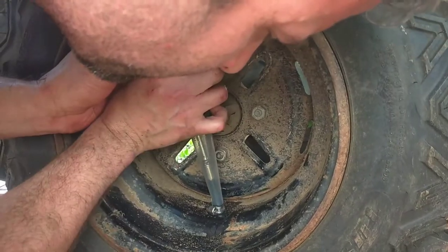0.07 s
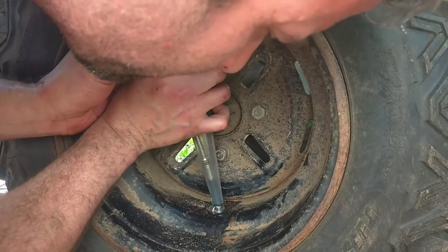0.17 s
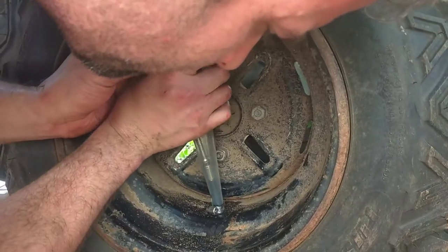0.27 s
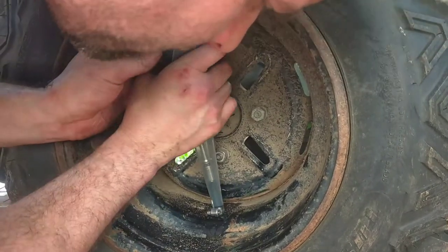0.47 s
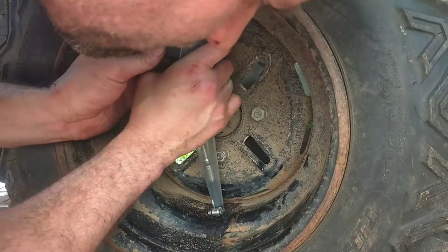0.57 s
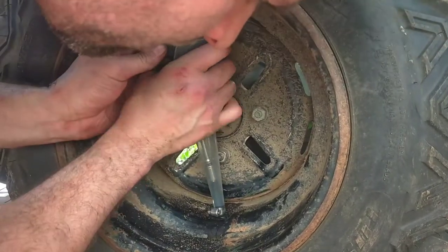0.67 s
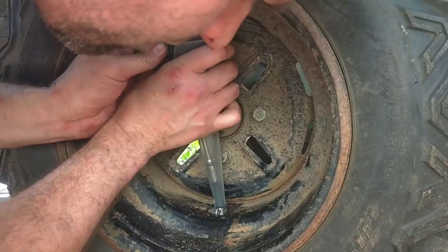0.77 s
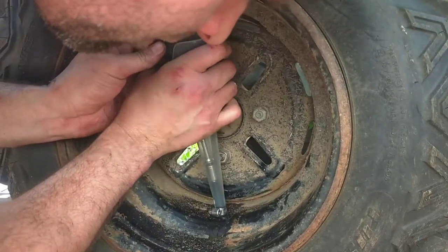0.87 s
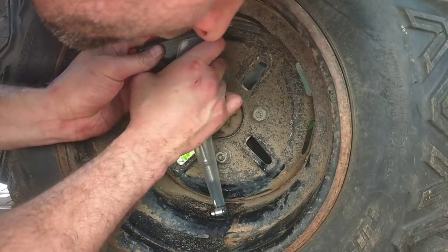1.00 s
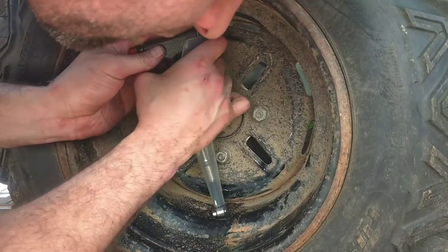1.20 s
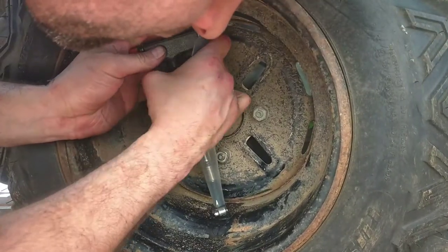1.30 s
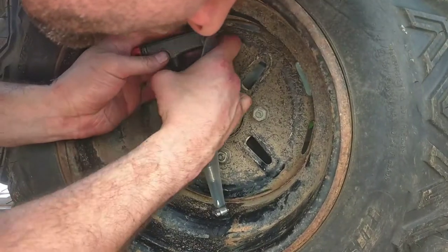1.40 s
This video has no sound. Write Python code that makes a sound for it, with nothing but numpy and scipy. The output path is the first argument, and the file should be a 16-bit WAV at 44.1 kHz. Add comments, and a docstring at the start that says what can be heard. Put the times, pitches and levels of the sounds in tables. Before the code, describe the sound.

Two dull clicks of a metal tool on a wheel rim, over outdoor rumble and hiss.

```python
"""Outdoors, beside a wheel: hands set a metal tool against the steel rim.
Two dull clicks stand out, with light taps between them and soft bumps on the tyre.
Further off lie a low wavering drone, perhaps a far engine, and outdoor rumble; the microphones hiss.
The recorder widens the stereo image by feeding each side, inverted and late, to the other."""
import sys
import numpy as np
from scipy.fft import rfft, irfft, next_fast_len
from scipy.io import wavfile
from scipy.ndimage import map_coordinates

SR = 44100
rng = np.random.default_rng(int(sys.argv[2]) if len(sys.argv) > 2 else 0)


def store_pcm(level_fs):
    """Save levels as 16-bit WAV."""
    pcm = np.round(np.clip(level_fs, -1, 1) * 32767).astype(np.int16)
    wavfile.write(sys.argv[1], SR, np.atleast_2d(pcm).T)


N = 63945


def amp(db):
    """Decibels to gain."""
    return 10 ** (np.asarray(db) / 20)


def curves(rows):
    """One value per sample for each column after the time."""
    times, *columns = np.transpose(rows)
    return [np.interp(np.arange(N) / SR, times, column) for column in columns]


def since(start):
    """Seconds since start, zero before it."""
    return np.maximum(np.arange(N) / SR - start, 0)


def wobble(rate):
    """A smooth random curve, rate knots a second."""
    return map_coordinates(rng.standard_normal(256), [np.arange(N) * rate / SR], mode="wrap")


def filtered(x, response):
    """x through a filter given as a complex response of frequency."""
    size = next_fast_len(N + SR // 4)
    hz = np.fft.rfftfreq(size, 1 / SR)
    return irfft(rfft(x, size) * response(hz), size)[..., :N]


def noise(spectrum):
    """Noise whose density joins (f/Hz, level/dB per Hz) points on a log frequency axis."""
    points_hz, db = np.transpose(spectrum)
    white = rng.standard_normal(N) * np.sqrt(SR / 2)
    return filtered(white, lambda hz: amp(np.interp(np.log(hz + 1), np.log(points_hz + 1), db)))


def fade(t, t60, attack_s):
    """A quick, rounded rise and an exponential decay."""
    return (1 - np.exp(-t / attack_s)) ** 2 * np.exp(-np.log(1000) * t / t60)


def burst(t, spectrum, t60, attack_s):
    """A dying puff of coloured noise; only the shape of the spectrum counts."""
    puff = noise(spectrum)
    return puff / puff.std() * fade(t, t60, attack_s)


def ring(t, modes, decay_scale, attack_s):
    """Struck modes, each varying in strength by about 2 dB from blow to blow."""
    out = np.zeros(N)
    for hz, db, t60 in modes:
        gain = amp(db + 2 * rng.standard_normal())
        out += gain * np.sin(2 * np.pi * hz * t) * fade(t, t60 * decay_scale, attack_s)
    return out


def outdoors(rumble_db, air_db):
    """Low rumble all around, under a faintly flickering midrange wash of open air."""
    # base spectra of the rumble and the air: f/Hz, level/dB per Hz
    rumble = [(20, -93), (40, -74), (60, -67.5), (90, -63), (130, -62), (170, -68.5), (225, -70.5),
              (290, -75.5), (360, -86.5), (500, -89), (1000, -115)]
    air = [(100, -105), (350, -90.5), (600, -89.5), (750, -86.5), (1100, -88.5), (1500, -92.5),
           (2200, -101), (4000, -112), (8000, -128)]
    return amp(rumble_db) * noise(rumble) + amp(air_db + 0.37 * wobble(rate=39.64)) * noise(air)


def microphone_hiss(gain_db):
    """Left and right microphones each make their own noise."""
    # base spectrum of the self-noise: f/Hz, level/dB per Hz
    hiss = [(100, -100), (400, -88), (1200, -105), (2200, -103), (3500, -104), (5000, -110), (7000, -115),
            (9000, -121), (12000, -114), (15000, -109), (16000, -110)]
    return amp(gain_db) * np.array([noise(hiss), noise(hiss)])


def drone():
    """One low wavering tone, perhaps a far engine, that swells, sags and fades."""
    # course of the tone: t/s, f/Hz, level/dB
    course = [(0, 114.1, -91), (.29, 112.7, -48), (.34, 114.2, -52), (.56, 118, -41.5), (.67, 113.7, -46),
              (.76, 114.2, -44.5), (.90, 114.9, -40.5), (.94, 118.5, -53), (.99, 116.2, -39),
              (1.08, 119.6, -40), (1.16, 112, -41), (1.26, 109.1, -39.5), (1.35, 111.2, -49),
              (1.45, 112, -58)]
    hz, db = curves(course)
    waver_db = -0.5 * wobble(rate=23)
    phase = 2 * np.pi * np.cumsum(hz) / SR
    return np.sqrt(2) * amp(db + waver_db) * np.sin(phase)


def tool_on_rim():
    """Each contact rings the rim, snaps, pings at the tool's edge and scatters off the wheel dish."""
    # contacts: t/s, level/dB, decay scale, pitch ratio, tilt/dB per octave, relative ping level/dB
    contacts = [(.2108, -17, 0.74, 0.99, -1, -19), (.403, -51, 0.49, 1.36, -22, -40),
                (.430, -50.5, 1.1, 0.96, 7, -42), (.510, -41.5, 0.79, 1, -4, -48),
                (.543, -39, 0.94, 1, -3, -34), (.641, -38.5, 0.73, 0.91, -3, -40),
                (.703, -43.5, 0.99, 0.92, 5, -40), (.830, -35, 0.43, 1.41, -6, -40),
                (.835, -42, 0.53, 1.9, -1, -40), (.917, -42, 0.33, 1.12, -12, -40),
                (.995, -39.5, 1.42, 0.87, -9.5, -40), (1.0380, -30.5, 0.19, 0.91, 9.5, -42),
                (1.0391, -22.5, .45, .99, 4, -37), (1.177, -69, .7, 1.1, -4, -40)]
    # base modes of the rim, damped by tyre and hands: f/Hz, level/dB, t60/s
    rim_modes = [(355.7, -26.5, 0.18), (474, -32, .11), (555, -33, 0.069), (759, -2, 0.062),
                 (859, -18.5, 0.12), (857, -9, 0.023), (1072, -17.5, 0.081), (1277, -18.5, 0.057),
                 (1363, -16.5, 0.09), (1450, -28.5, 0.15), (2010, -27, 0.075), (2763, -17, 0.016),
                 (3010, -23.5, 0.018), (4830, -30, .014)]
    # spectra of the hard contact, the bare metal edge and the near reflections: f/Hz, relative level/dB
    snap_spectrum = [(1500, -34), (2300, 5), (2800, 0.5), (3600, -7), (4200, -14), (6000, -17), (9000, -40),
                     (14000, -46)]
    ping_spectrum = [(4000, -25), (7000, -14), (9500, -31), (11000, -9), (12800, -11), (14400, 6),
                     (15700, -2)]
    dish_spectrum = [(250, -27), (500, -22), (850, 5), (1400, 4.5), (1800, -38), (2800, -17), (5000, -22),
                     (10000, -45)]
    attack_s, contact_t60_s = 0.0006, 0.013
    strongest_hz = max(rim_modes, key=lambda mode: mode[1])[0]
    out = np.zeros(N)
    for start, db, decay_scale, pitch, tilt, ping_db in contacts:
        t = since(start)
        modes = [(hz * pitch, level + tilt * np.log2(hz / strongest_hz), t60)
                 for hz, level, t60 in rim_modes]
        snap = amp(-17) * burst(t, snap_spectrum, contact_t60_s, attack_s)
        ping = amp(ping_db) * burst(t, ping_spectrum, contact_t60_s, attack_s)
        reflections = amp(-21) * decay_scale * burst(t, dish_spectrum, t60=0.12, attack_s=0.003)
        out += amp(db) * (ring(t, modes, decay_scale, attack_s) + snap + ping + reflections)
    return out


def hands_on_tyre():
    """Soft bumps of the hands stir the tyre's low, short-lived modes."""
    # bumps: t/s, level/dB
    bumps = [(0.323, -37.5), (.531, -40), (0.734, -29), (1.142, -36), (1.305, -26.5), (1.378, -32.5)]
    # base modes of the tyre: f/Hz, level/dB, t60/s
    tyre_modes = [(88, -5, 0.13), (137, 7, 0.057), (203.7, -7.5, 0.11)]
    return sum(amp(db) * ring(since(start), tyre_modes, decay_scale=0.96, attack_s=0.0042)
               for start, db in bumps)


def scene():
    """Wheel and surroundings reach the right microphone only; both microphones hiss."""
    # gains on the background spectra: t/s, rumble/dB, air/dB, hiss/dB
    background = [(0, -4.5, -5.5, -3), (.2, -6, -4.5, -4), (.33, -7, -2, -1), (.5, -2.5, 1, -1.5),
                  (.8, -4.5, 0, -1), (1.1, -2.5, 2, 0), (1.3, -2, 1, -0.5), (1.45, -6.5, -2, -1)]
    rumble_db, air_db, hiss_db = curves(background)
    ambience = outdoors(rumble_db, air_db)
    left, right = microphone_hiss(hiss_db)
    wheel = tool_on_rim() + hands_on_tyre()
    return np.array([left, right + wheel + drone() + ambience])


def record(dry):
    """The recorder widens by subtracting a late copy of the opposite side, then cuts the top treble."""
    cross_db, cross_delay_s = -0.38, 20 / SR
    left_db, top_hz = -0.65, 15900
    late_opposite = filtered(dry[::-1], lambda hz: np.exp(-2j * np.pi * hz * cross_delay_s))
    wide = dry - amp(cross_db) * late_opposite
    return filtered(wide * amp([[left_db], [0]]), lambda hz: hz < top_hz)


dry = scene()
out = record(dry)
store_pcm(out)
```